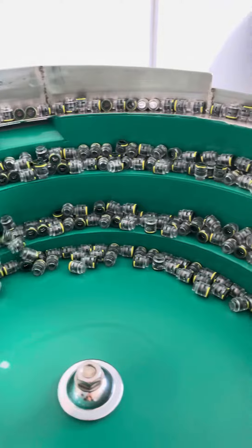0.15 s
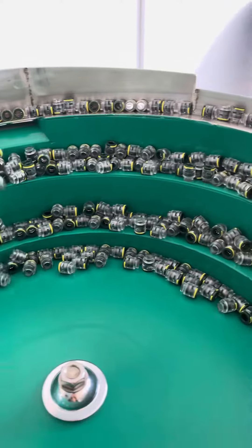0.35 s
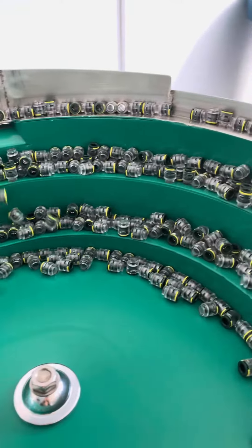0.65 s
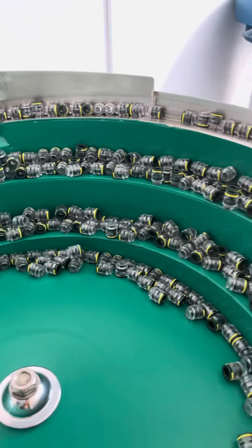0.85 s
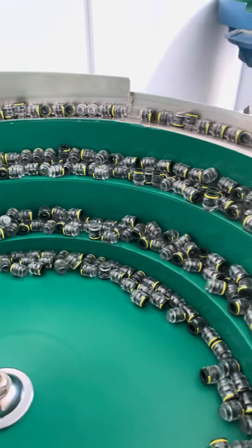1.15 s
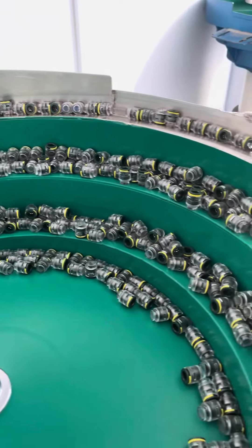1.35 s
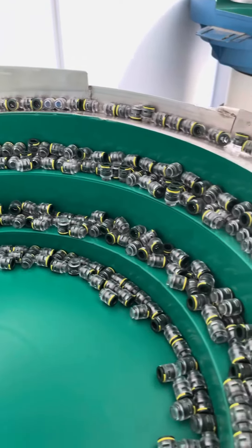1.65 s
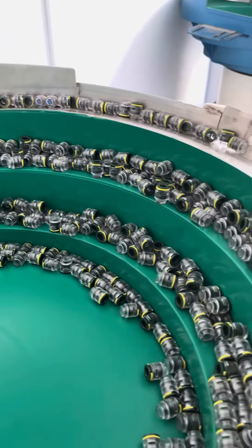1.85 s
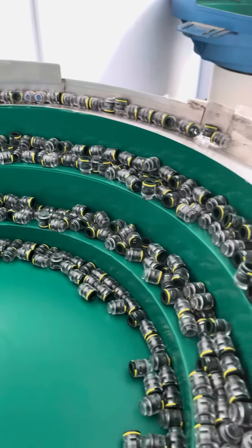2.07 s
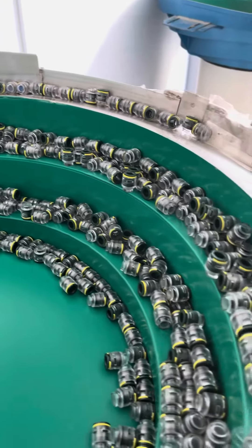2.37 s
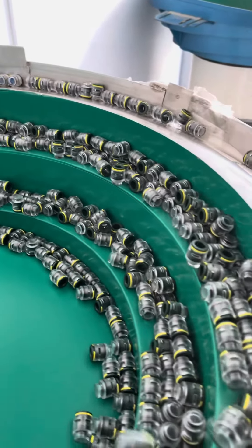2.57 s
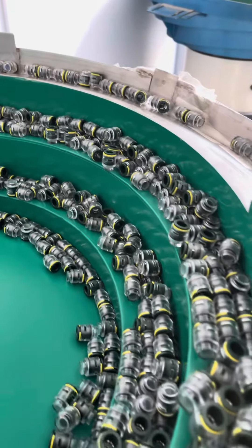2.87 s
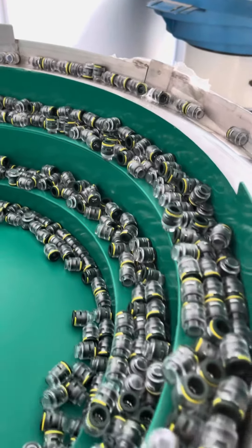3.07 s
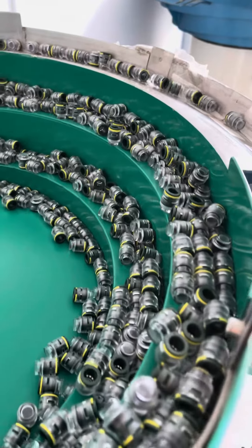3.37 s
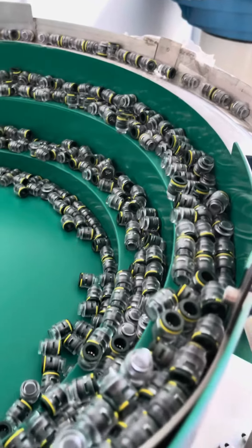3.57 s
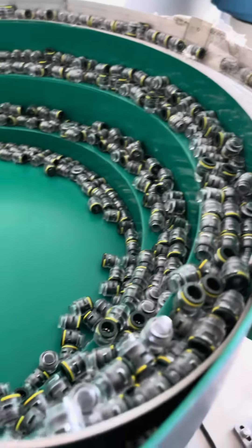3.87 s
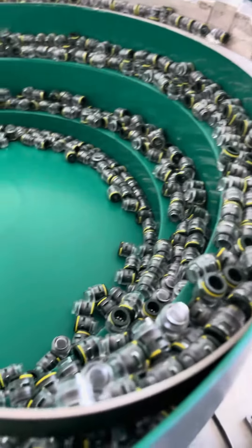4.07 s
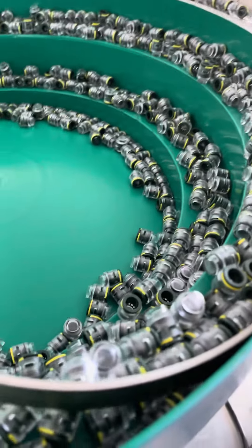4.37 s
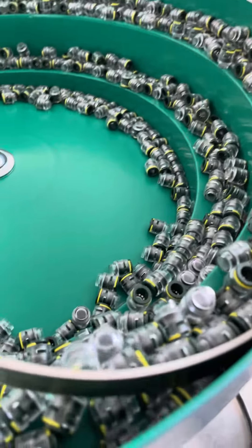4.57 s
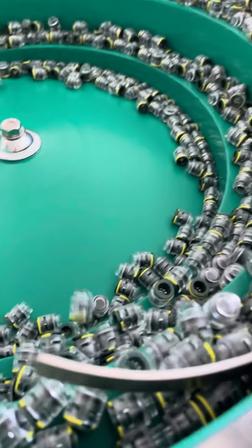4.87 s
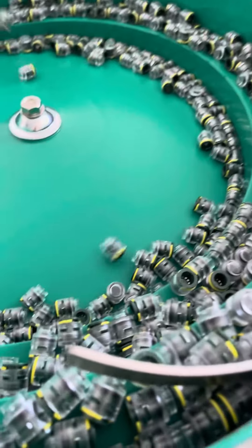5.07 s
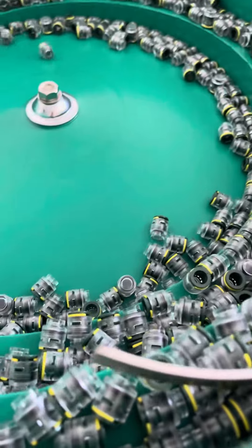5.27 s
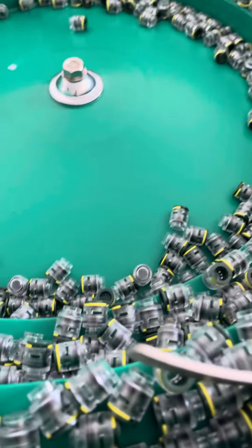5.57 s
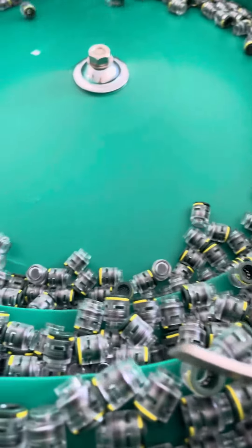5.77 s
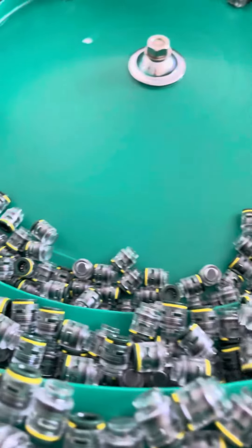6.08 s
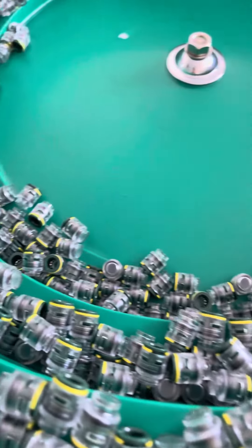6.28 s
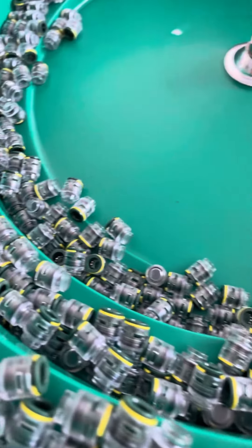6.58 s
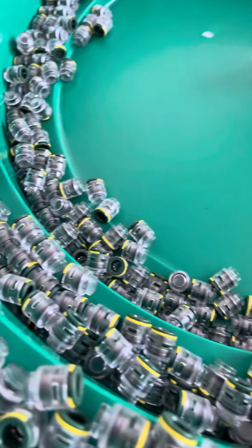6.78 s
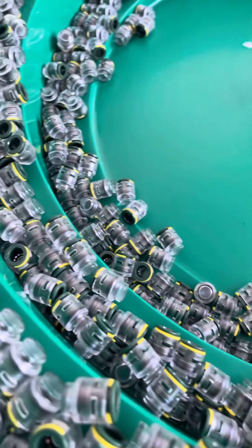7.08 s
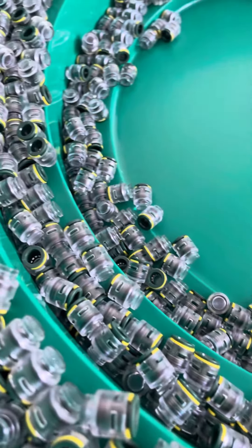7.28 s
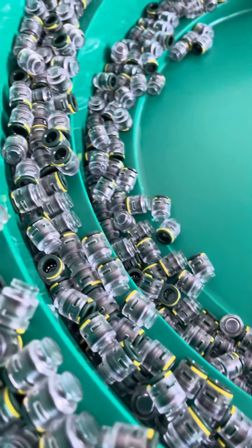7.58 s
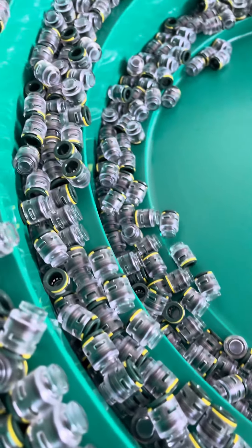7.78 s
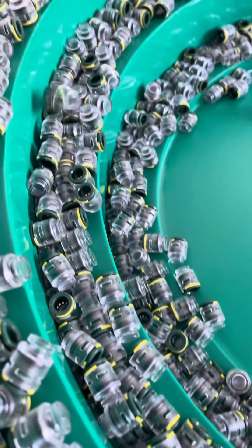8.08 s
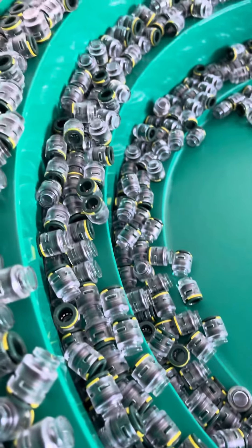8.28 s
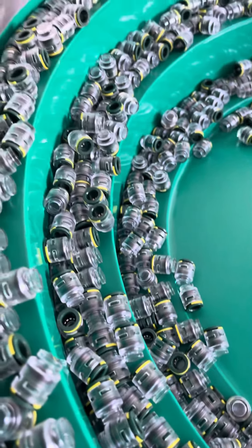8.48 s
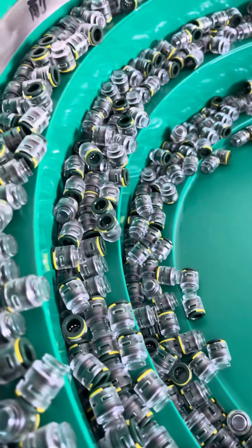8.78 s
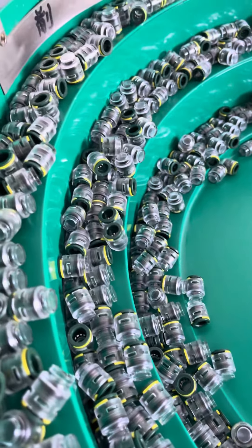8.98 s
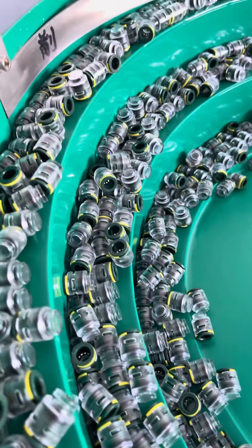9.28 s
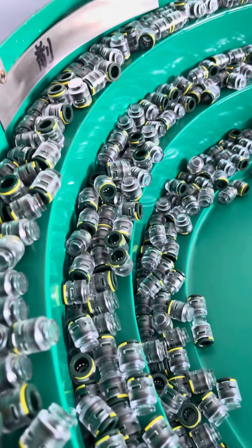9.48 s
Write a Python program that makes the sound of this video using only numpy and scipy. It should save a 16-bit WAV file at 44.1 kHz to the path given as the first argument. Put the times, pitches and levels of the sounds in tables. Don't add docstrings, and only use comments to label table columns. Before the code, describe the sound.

A vibratory feeder bowl drones with a low, steady mains hum while countless small plastic fittings chatter along its spiral track. Irregular bright clacks, short clatters and small ticks come several times a second, some ringing a steel rail, others thudding dully on the coated floor. Close stereo phone sound in a workshop, loud, bright and slightly squashed on the sharpest hits, without any pause from start to end.

```python
import sys
import numpy as np
from scipy import signal
from scipy.fft import rfft, irfft, next_fast_len
from scipy.io import wavfile
from scipy.ndimage import uniform_filter1d

SR = 44100
rng = np.random.default_rng(int(sys.argv[2]) if len(sys.argv) > 2 else 0)


def convert_level_to_amplitude(level_db):
    exponent = np.asarray(level_db, float) / 20
    return 10 ** exponent


def transcribe(u):
    v = np.clip(np.atleast_2d(u).T, -1, 1)
    q = np.round(v * 32767).astype(np.int16)
    wavfile.write(sys.argv[1], SR, q)


N = 425124

SHAKE_HZ = 50.016
SECOND_DB, SECOND_FOLLOWS = -23, 0.38
LEAD_RAD_PER_DB = .035
RIM_FROM_S, RIM_DB_PER_S = 8.3, -11
BODY_DB, BODY_FOLLOWS, FIZZ_DB, JOSTLE_DB = -26.5, 0.36, -29.5, -30.0
EDGE_DB_PER_DB = -0.38
ROLL_T60_S, SLAP_T60_S, TICK_T60_S, BOUNCE_T60_S = 0.16, 0.076, 0.16, 0.09
CRACK, CRACK_S = 0.8, 0.004
FLOOR_SPREAD_DB = 3.5
TAP_HZ, NICK_T60_S, NICK_WIDTH_HZ = 6200, .07, 700
DUCK_FROM_DB, DUCK_SHARE, DUCK_S = -16.5, 0.5, 0.0066

# time in seconds, hum level in dB, left over right in dB.
HUM_PATH = [
    (0.0, -13.5, -3.5),
    (0.35, -14, -4),
    (2.2, -14.5, -3.5),
    (3.76, -19, 0),
    (6.68, -16.5, -1.5),
    (9.64, -17, -4),
]
# time in seconds, way in wave lengths.
BOWL_WAY = [(0.0, 0.013), (1.0, 0.44), (2.25, 0.46), (4.4, 0.59), (7.3, 0.99), (9.64, 1)]
# multiple of the shake, level in dB.
HUM_ORDERS = [(3, -34), (4, -38), (5, -45), (6, -44), (8, -48), (10, -48), (11, -47)]
ORDER_LAG_RAD = [.27, 1.6, 1.5, 2.4, 3., 4.2, 5.4, 6.]
# order, mean level in dB, swing in dB, crests per wave length, first crest in wave lengths.
WALL_WAVES = [(12, -39, 1.5, 1.9, .55), (14, -40.5, 7.5, .62, 1.12), (15, -40.5, 4, .9, .62),
              (16, -39.5, 3.5, .9, .86)]
# start in seconds, clack level in dB, shell pitch in Hz, rail ring in dB, clack t60 in seconds.
STRIKES = [(0.4663, -11.5, 7740, -10, 0.1), (1.0824, -6, 6200, -5.5, 0.2), (1.4108, -5, 6100, -5, 0.073),
           (1.478, -4, 6000, -12.5, 0.068), (1.566, -17.5, 3700, -2.5, 0.087),
           (1.695, -17, 6960, -2.5, 0.41), (2.7544, -5, 6500, -6.5, 0.25), (2.873, -15.5, 6400, -3.5, 0.52),
           (3.6501, -3.5, 6600, -7, 0.19), (3.973, -4.5, 6030, -3.5, 0.24), (4.228, -6.5, 6400, -5, 0.068),
           (5.6001, -5.5, 5460, -3.5, 0.24), (5.7625, -11, 5370, -5, 0.11), (6.0019, -9.5, 6200, 0.5, 0.36),
           (6.0385, -7, 6440, -9, 0.066), (6.423, -10.5, 4300, -0.5, 0.21), (6.829, -11.5, 4400, -1, 0.23),
           (8.0291, -11, 6400, -2.5, 0.23), (8.1359, -9, 6100, -6.5, 0.29), (8.376, -7.5, 6600, -5, 0.13),
           (8.3987, -9.5, 6200, -6.5, 0.16), (8.85, -11, 6200, -9.5, 0.17), (9.431, -16.5, 7200, -4, 0.1),
           (9.461, -10.5, 4300, -1.5, 0.21)]
# start in seconds, level in dB, shell pitch in Hz, t60 in seconds.
SNAPS = [(0.1303, -4.5, 5030, 0.1), (0.648, -9, 6150, 0.38), (1.269, -18, 3890, 0.17),
         (1.361, -13, 6100, 0.17), (1.4376, -5, 5800, 0.25), (2.0353, -17, 6100, 0.099),
         (2.477, -17, 7340, 0.3), (2.663, -9, 7140, 0.093), (3.032, -6.5, 6200, 0.32),
         (3.332, -13, 7050, 0.06), (3.866, -13.5, 9400, 0.061), (3.9395, -10.5, 6800, 0.12),
         (4.157, -8, 5300, 0.11), (4.2694, -6.5, 3580, 0.15), (4.3977, -9.5, 8230, 0.071),
         (4.452, -6.5, 6100, 0.025), (4.4986, -9, 5850, 0.043), (5.0763, -9, 6600, 0.061),
         (5.169, -14, 6140, 0.075), (5.829, -9.5, 7100, 0.15), (5.896, -4.5, 3560, 0.16),
         (6.224, -8.5, 5900, 0.21), (6.2918, -10.5, 9500, 0.3), (7.192, -13.5, 6040, 0.2),
         (7.468, -15, 6300, 0.03), (7.4939, -13.5, 6300, 0.05), (7.5595, -5, 6000, 0.078),
         (7.9624, -18, 3580, 0.13), (9.25, -17.5, 7140, 0.072)]
# start in seconds, level in dB, shell pitch in Hz.
ROLLS = [(0.0365, -11, 6200), (0.365, -9, 6700), (0.318, -15.5, 6200), (0.5857, -10, 5700),
         (1.639, -11.5, 5550), (1.833, -14.5, 5580), (2.069, -7, 6150), (2.5551, -9, 5960),
         (3.089, -9.5, 5800), (3.158, -11, 3760), (3.7364, -6.5, 6000), (4.007, -7.5, 6460),
         (4.3562, -7.5, 7850), (4.527, -12.5, 3870), (4.922, -11, 5630), (4.9318, -10.5, 7000),
         (4.9524, -20, 6000), (7.034, -7.5, 3770), (7.6808, -10, 7700), (8.5107, -6.5, 3950),
         (9.3547, -6.5, 6400)]
# start in seconds, level in dB, shell pitch in Hz.
SLAPS = [(0.2627, -10, 5940), (0.2768, -7.5, 5500), (0.438, -15.5, 5700), (0.497, -8.5, 5700),
         (1.6033, -11, 6310), (1.917, -13, 5540), (1.952, -6, 5800), (2.155, -12, 6140), (2.436, -12, 6400),
         (3.403, -13, 5900), (3.504, -7, 5800), (4.089, -10.5, 3870), (4.616, -11.5, 5140),
         (4.733, -14, 5730), (4.8254, -2, 6200), (5.0337, -7.5, 6160), (5.1344, -13.5, 7000),
         (5.1903, -9, 6400), (5.4067, -13.5, 6750), (5.444, -12, 6300), (5.578, -4.5, 6330),
         (6.9143, -5, 5930), (7.0074, -8.5, 7000), (7.132, -2.5, 6300), (7.546, -22, 6300),
         (8.1046, -10, 5900), (8.367, -8, 7360), (8.752, -10.5, 6200), (9.4446, -12, 7000),
         (4.9318, -6, 6350)]
# start in seconds, level in dB, shell pitch in Hz.
TICKS = [(0.221, -14.5, 6200), (1.202, -13, 5800), (1.811, -17, 5100), (2.902, -16, 5260),
         (3.8042, -17, 7800), (4.1945, -17, 4000), (5.5417, -21, 7160), (5.6652, -23, 6930),
         (5.9494, -15, 6230), (5.964, -13, 6940), (6.33, -28, 5530), (6.5293, -17.5, 6600),
         (7.226, -11.5, 3660), (7.856, -18.5, 6000), (8.084, -17, 5300), (8.1958, -18, 5220),
         (8.2543, -14, 3570), (8.628, -17, 6600), (8.913, -19, 6280), (9.139, -20, 3770)]
# start in seconds, level in dB, shell pitch in Hz.
BOUNCES = [(0.3806, -14, 6680), (0.531, -11.5, 4660), (.5744, -16, 5700), (1.5329, -15, 7810),
           (1.7468, -18, 5230), (1.784, -12, 2420), (1.89, -16.5, 5800), (2.0894, -15, 6100),
           (3.563, -14.5, 6450), (4.5525, -18, 6800), (4.7444, -17, 2350), (5.0055, -14, 6070),
           (5.459, -17, 2390), (5.5674, -15, 6390), (5.771, -9, 3950), (6.6049, -18, 6910),
           (6.7141, -18, 6800), (7.2983, -14.5, 6400), (8.1005, -22, 6070), (8.1726, -12, 5200),
           (8.9945, -16, 5700), (9.232, -25, 6000), (9.3447, -38, 6370), (9.4994, -13, 2450)]
EDGE_DB = {"strike": -15, "snap": -12.5, "roll": -23, "slap": -21.5, "tick": -16}
GLANCE_DB = {"snap": -19, "roll": -14, "slap": -13.5, "tick": -27}
# frequency in Hz, density in dB per Hz.
CLACK_COLOUR = [(900, -27.5), (2200, -1.5), (4000, -1), (6300, 0.5), (9200, 1), (10800, -6.5), (12500, -18),
                (16000, -38), (16500, -70)]
# frequency in Hz, level in dB, t60 in seconds.
RAIL_MODES = [(1336, -5, .26), (1505, -4, .15), (1658, 0, .28), (2562, -8, .12), (3660, -9, .2),
              (3897, -5, .17), (4360, -4, .2), (4520, -9, .1), (5150, -14, .12), (6160, -8, .12),
              (6700, -7, .2), (7170, -12, .12), (7670, -6, .16), (8120, -9, .1)]
# frequency in Hz, level in dB, t60 in seconds.
RAIL_TOP_MODES = [(4866, -5, .2), (7900, -4, .08), (8634, 0, .13), (8871, 0, .13), (9259, -1, .13),
                  (9797, -4, .12), (10335, -6, .07), (10700, -5, .07)]
# frequency in Hz, level in dB, t60 in seconds.
PLATE_MODES = [(1490, 0, 0.17), (1900, -6, .12), (2519, 4, 0.16), (3251, 9, .2), (3820, -1, 0.17),
               (4005, -2, 0.2), (4801, -1, .15), (5211, 1, .2), (5684, -12, .1), (6416, 7, 0.13),
               (7708, 6, 0.11), (7816, 6, .1)]
# start in seconds, level in dB.
PLATE_PINGS = [(0.466, -25), (1.5329, -28), (2.754, -45), (2.901, -28), (3.7382, -26), (3.8046, -43),
               (4.157, -45), (4.3569, -26.5), (5.762, -26), (6.529, -30), (8.174, -31), (8.511, -26)]
# start in seconds, level in dB, low mode in Hz, high mode share in dB.
THUDS = [(0.132, -19.5, 1190, 10), (.465, -31, 1070, 21.5), (0.591, -12, 686, 7), (1.411, -26, 750, 11),
         (1.446, -5.5, 686, 1), (1.953, -11, 665, -9), (2.07, -5, 680, -3), (2.754, -15, 1170, -14),
         (3.162, -7.5, 1120, -7), (3.275, -15.5, 660, 6), (3.504, -12.5, 695, 7.5), (3.982, -12, 1143, -2),
         (4.195, -21.5, 655, 13), (4.228, -31, 755, 9), (4.826, -15, 690, 8), (4.931, -9.5, 684, 7),
         (5.032, -6.5, 1140, -6), (5.268, -22, 700, 10), (5.581, -14.5, 666, 13), (5.833, -22, 770, 15),
         (6.422, -23, 816, -7), (7.041, -6, 686, 5), (7.137, -8.5, 678, 1.5), (7.195, -3, 1057, -9),
         (7.232, -7.5, 693, 2), (7.544, -6.5, 697, -3), (2.96, -15, 1120, 5), (4.96, -10, 670, -6),
         (1.49, -19, 1080, 10), (9.5, -16.5, 680, 6), (8.028, -23, 700, 8), (8.397, -15, 1033, 11.5),
         (8.96, -8, 686, -7), (5.06, -12, 654, -16), (8.753, -10.5, 694, 2.5), (8.858, -9, 710, 3.5),
         (9.475, -14.5, 710, 13)]
# frequency in Hz, level in dB, width in Hz.
FLOOR_MODES = [(1033, -15, 30), (1188, -6, 30), (1242, -4, 30), (1507, 3.5, 61), (1733, 2, 38),
               (2000, -7.5, 45), (2344, 0, 32), (2750, -3, 110), (3180, -6, 83)]
# start in seconds, level in dB, pitch in Hz.
NICKS = [(0.2113, -16.5, 8600), (0.3723, -19, 8850), (0.5836, -20, 10100), (1.1907, -22, 9000),
         (1.2224, -16, 8250), (1.4223, -14, 9000), (1.467, -15, 8400), (1.7472, -13, 9360),
         (1.7656, -19, 9550), (1.7871, -13, 9300), (2.4969, -17, 9900), (2.7834, -21, 8550),
         (2.9669, -19, 9600), (3.0908, -22, 8700), (3.1212, -20, 9660), (3.2734, -16.5, 9500),
         (3.9415, -7, 9150), (4.1844, -23, 7800), (4.5269, -15, 9700), (4.7369, -23, 10400),
         (5.1893, -14, 9100), (5.269, -18, 9050), (5.4071, -21, 9500), (5.4524, -12.5, 9500),
         (5.5754, -15, 8600), (5.8866, -18, 10600), (5.9632, -19, 8200), (5.9858, -18, 9900),
         (6.0385, -22, 9400), (6.3305, -11, 9050), (6.4437, -20, 9300), (6.4675, -17, 9100),
         (6.6439, -17, 8400), (6.7136, -14, 9200), (6.9984, -17, 8400), (7.2969, -22, 10300),
         (7.544, -15, 8200), (7.6165, -17, 9600), (8.1037, -19, 9800), (8.1954, -15, 9700),
         (8.2939, -17, 9400), (9.3856, -20, 9170), (9.4306, -18.5, 9100), (9.4734, -6, 8680),
         (9.4912, -15.5, 9250)]
# start in seconds, level in dB.
TAPS = [(.0533, -23), (0.34, -21), (.4255, -21), (1.2944, -28), (1.3378, -24), (2.3678, -39), (2.6401, -26),
        (2.8321, -23), (2.9275, -23), (3.321, -21), (3.365, -26), (4.669, -23), (7.7151, -20),
        (7.8348, -21), (8.4575, -22), (8.9471, -29), (9.6081, -28)]
# time in seconds, level in dB.
CROWD_LIVELY = [(0.0, 2.5), (0.54, 4), (0.7, -1.5), (1.5, 1), (2.3, -2), (3.3, -1), (4.6, -0.5), (5.3, 0),
                (6.2, -1), (6.7, 1), (7.4, 0), (7.9, -0.5), (8.56, 1.5), (9.15, -5.5), (9.64, 0)]
# frequency in Hz, density in dB per Hz.
CROWD_BODY = [(45, 5), (90, 5.5), (170, 4.5), (320, -5.5), (361, -0.5), (400, -6.5), (570, -10.5),
              (620, -1), (675, 4.5), (770, -4.5), (930, -3.5), (1600, 0), (2650, -0.5), (3000, -6.5),
              (5000, -37.5)]
# frequency in Hz, density in dB per Hz.
CROWD_FIZZ = [(1500, -16.5), (3000, 3), (4800, -3), (6300, -2.5), (9200, -0.5), (10500, -4), (12800, -14),
              (13500, -28.5), (16300, -60)]
# frequency in Hz, likeness from 0 to 1, right over left in dB.
PORT_LIKENESS = [(60, 0.69, -4.5), (232, 1, 4.5), (440, 0.65, 8.5), (830, 0.025, 7), (2010, 0.96, -1.5),
                 (2450, 0.048, 3), (2930, 0.28, 0), (4400, 0.39, 2), (5030, 0.7, -0.5), (5030, 0.57, 4.5),
                 (5200, 0.64, 4), (5800, 1, -1.5), (7050, 0.66, 1), (9800, 0.95, -1), (10290, 0.7, 1),
                 (11900, 0.7, -1)]
# frequency in Hz, phase of right against left in radians.
PORT_TURN = [(0, .15), (500, 1.), (1000, -.6), (1800, -.1), (2300, -.8), (2700, -3), (3300, -2.8),
             (4000, -1.1), (4850, -3.1), (5800, -6.28), (8300, -9.1), (9400, -9.43), (11900, -12.57),
             (13800, -12.6)]


def evened(x):
    return x / np.sqrt(np.mean(x ** 2) + 1e-20)


def curves(rows):
    s, *columns = np.transpose(rows)
    return [np.interp(np.arange(N) / SR, s, c) for c in columns]


def read(points, hz, order=1):
    table = np.transpose(points)
    return np.interp(np.log(hz + 1), np.log(table[0] + 1), table[order])


def coloured(x, points):
    size = next_fast_len(N)
    gain = convert_level_to_amplitude(read(points, np.fft.rfftfreq(size, 1 / SR)))
    return evened(irfft(rfft(x, size) * gain, size)[:, :N])


def drift(seconds, count):
    z = rng.standard_normal((count, N // 100 + 2))
    width = max(int(seconds * SR / 100), 1)
    z = evened(uniform_filter1d(uniform_filter1d(z, width), width))
    return np.array([np.interp(np.arange(N) / 100, np.arange(len(v)), v) for v in z])


def ringing(z, hz, width_hz):
    r = np.exp(-np.pi * width_hz / SR)
    return evened(signal.lfilter([1, 0, -1], [1, -2 * r * np.cos(2 * np.pi * hz / SR), r * r], z))


def mode_bank(table, t):
    hz, db, t60_s = np.transpose(table)[:, :, None]
    return convert_level_to_amplitude(db - 60 * t / t60_s) * np.exp(2j * np.pi * hz * t)


def struck(modes, spread_db):
    g = rng.standard_normal((2, 2, len(modes)))
    return ((convert_level_to_amplitude(spread_db * g[0]) * np.exp(9j * g[1])) @ modes).real


def place(out, start_s, sound):
    at = round(start_s * SR)
    out[:, at:at + sound.shape[1]] += sound


def rise(t, seconds):
    return 1 - np.exp(-t / seconds)


def shake():
    return 2 * np.pi * SHAKE_HZ * np.arange(N) / SR + 1.012


def hum():
    first_db, pan_db = curves(HUM_PATH)
    way, = curves(BOWL_WAY)
    angle, out = shake(), np.zeros((2, N))
    second_db = SECOND_DB + SECOND_FOLLOWS * (first_db - first_db.mean())
    levels = [(1, first_db), (2, second_db)] + HUM_ORDERS
    lags = [LEAD_RAD_PER_DB * (first_db - first_db.max())] + ORDER_LAG_RAD
    port_lead = np.array([[0], [.18]])
    for (k, db), wobble, lag in zip(levels, drift(0.051, count=len(levels)), lags):
        out = out + convert_level_to_amplitude(db + 0.2 * k * wobble) * np.cos(k * angle - lag + port_lead / k)

    wall_lean_db = np.array([[-3.1], [2.1]])
    past_rim_s = np.maximum(np.arange(N) / SR - RIM_FROM_S, 0)
    phases = drift(1.5, count=8).reshape(4, 2, -1)
    for (k, mean_db, swing_db, crests, first), wobble, phase in zip(WALL_WAVES, drift(.08, count=4), phases):
        k = round(k)
        db = mean_db + swing_db * np.cos(2 * np.pi * crests * (way - first))
        if k == 16:
            db = db + RIM_DB_PER_S * past_rim_s
        out = out + convert_level_to_amplitude(db + 1.75 * wobble + wall_lean_db) * np.cos(k * angle + 0.6 * phase)
    return np.sqrt(2) * out * convert_level_to_amplitude(np.array([pan_db, -pan_db]) / 2)


def landings():
    rows = [(s, db, hz, rail, "strike", t60) for s, db, hz, rail, t60 in STRIKES]
    rows += [(s, db, hz, GLANCE_DB["snap"], "snap", t60) for s, db, hz, t60 in SNAPS]
    kinds = [("roll", ROLLS, ROLL_T60_S), ("slap", SLAPS, SLAP_T60_S), ("tick", TICKS, TICK_T60_S),
             ("slap", BOUNCES, BOUNCE_T60_S)]
    for kind, table, t60 in kinds:
        rows += [(s, db, hz, GLANCE_DB[kind], kind, t60) for s, db, hz in table]
    return [(s, db, hz, rail, EDGE_DB[kind] + EDGE_DB_PER_DB * (db + 8.0), t60)
            for s, db, hz, rail, kind, t60 in rows]


def clack_burst(grit, hz, edge_db):
    shell = 0.25 * ringing(grit, hz, 260)
    chance = 0.17 * sum(ringing(grit, f, 80) for f in rng.uniform(1537, 9000, size=4))
    treble = signal.lfilter(*signal.butter(2, 8600, "high", fs=SR), grit)
    return grit + shell + chance + (convert_level_to_amplitude(0.96 * (edge_db + 20.5)) - 1) * treble


def falls():
    rail, clack, t = np.zeros((2, N + SR)), np.zeros((2, N + SR)), np.arange(SR // 5) / SR
    modes = mode_bank(RAIL_MODES, t) * rise(t, 0.0041) ** 2
    spread_db = np.where(np.transpose(RAIL_MODES)[0] < 1700, 1.5, 3)
    for s, db, hz, rail_db, edge_db, t60 in landings():
        t60 = max(t60, .02)
        heard = t[:round(t60 * SR)]
        rise_s = .0001 if edge_db > -18 else .0009
        die = convert_level_to_amplitude(-60 * heard / t60) * rise(heard, rise_s) * (1 + CRACK * np.exp(-(heard / CRACK_S) ** 2))
        burst = clack_burst(rng.standard_normal((2, len(heard))), hz, edge_db)
        place(clack, s, convert_level_to_amplitude(db - 1.42) * burst * die)
        lean_db = 1.7 * (rail_db + 10)
        if lean_db >= -10:
            rattle = 1 + 0.4 * evened(uniform_filter1d(rng.standard_normal(len(t)), 150))
            place(rail, s, convert_level_to_amplitude(db + lean_db - 18.5) * struck(modes, spread_db) * rattle)
    hz = np.fft.rfftfreq(512, 1 / SR)
    colour = signal.minimum_phase(signal.firwin2(511, hz, convert_level_to_amplitude(2 * read(CLACK_COLOUR, hz)), fs=SR))
    return convert_level_to_amplitude(-1.97) * signal.oaconvolve(clack, colour[None], axes=1)[:, :N] + rail[:, :N]


def rail_top():
    out, t = np.zeros((2, N + SR)), np.arange(SR // 6) / SR
    modes = mode_bank(RAIL_TOP_MODES, t) * rise(t, 0.0016)
    for s, db, _, rail_db, _ in STRIKES:
        rattle = 1 + .6 * evened(uniform_filter1d(rng.standard_normal(len(t)), size=90))
        place(out, s, convert_level_to_amplitude(db + 1.9 * rail_db - 4.0) * rattle * struck(modes, 5.1))
    return out[:, :N]


def thuds():
    out, t = np.zeros((2, N + SR)), np.arange(SR // 7) / SR
    die = convert_level_to_amplitude(-60 * t / .105) * rise(t, .002)
    for s, db, low_hz, high_db in THUDS:
        spot_db = FLOOR_SPREAD_DB * rng.standard_normal(len(FLOOR_MODES))
        shove = rng.standard_normal((2, len(t))) * die
        low = ringing(shove, low_hz, 28) + .8 * ringing(shove, low_hz * .98, 45)
        upper = sum(convert_level_to_amplitude(d + e) * ringing(shove, f, w) for (f, d, w), e in zip(FLOOR_MODES, spot_db))
        high = 0.5 * upper + 0.35 * ringing(shove, 2170, 1600)
        place(out, s, convert_level_to_amplitude(db - 23.5) * (convert_level_to_amplitude(-7.5) * low + convert_level_to_amplitude(high_db - 3.5) * high))
    return out[:, :N]


def plate():
    out, t = np.zeros((2, N + SR)), np.arange(SR // 5) / SR
    modes = mode_bank(PLATE_MODES, t) * rise(t, 0.0026)
    for s, db in PLATE_PINGS:
        place(out, s, convert_level_to_amplitude(db) * struck(modes, 1.5))
    return out[:, :N]


def nicks():
    out, t = np.zeros((2, N + SR)), np.arange(SR // 16) / SR
    die = convert_level_to_amplitude(-60 * t / NICK_T60_S) * rise(t, 0.00031)
    for s, db, hz in NICKS + [(s, db, TAP_HZ) for s, db in TAPS]:
        puff = ringing(rng.standard_normal((2, len(t))), hz, NICK_WIDTH_HZ)
        place(out, s, convert_level_to_amplitude(db - 2.5) * die * puff)
    return out[:, :N]


def jostle():
    hit = rng.random((2, N)) < 900 / SR
    size = convert_level_to_amplitude(4.5 * np.minimum(rng.exponential(1, (2, N)), 3)) * hit
    shell = rng.integers(0, 18, (2, N))
    pitches_hz = np.geomspace(1300, 6500, 18) * rng.uniform(.96, 1.04, 18)
    return evened(sum(ringing(size * (shell == k), hz, .013 * hz) for k, hz in enumerate(pitches_hz)))


def crowd():
    lively_db, = curves(CROWD_LIVELY)
    flutter = drift(.012, count=2)
    beat = convert_level_to_amplitude(0.21 * np.cos(shake() - 4.2))
    low = coloured(rng.standard_normal((2, N)) * beat * convert_level_to_amplitude(1.75 * flutter[0]), CROWD_BODY)
    knocks = convert_level_to_amplitude(6.5 * np.minimum(rng.exponential(1, N), 3)) * (rng.random(N) < 300 / SR)
    knocks = signal.lfilter([1], [1, -np.exp(-1 / (.004 * SR))], knocks)
    grain = (0.97 + 0.32 * evened(knocks)) * convert_level_to_amplitude(0.35 * flutter[1])
    high = coloured(rng.standard_normal((2, N)) * grain, CROWD_FIZZ)
    return convert_level_to_amplitude(BODY_DB + BODY_FOLLOWS * lively_db) * low + convert_level_to_amplitude(FIZZ_DB + lively_db) * high


def ports(pair):
    size = next_fast_len(N)
    hz, (left, own) = np.fft.rfftfreq(size, 1 / SR), rfft(pair, size)
    same = np.clip(read(PORT_LIKENESS, hz), 0, 1)
    turn = np.exp(1j * np.interp(hz, *np.transpose(PORT_TURN)))
    right = same * turn * left + np.sqrt(1 - same ** 2) * own
    return irfft([left, right * convert_level_to_amplitude(read(PORT_LIKENESS, hz, order=2))], size)[:, :N]


def scene():
    parts = falls() + rail_top() + thuds() + plate() + nicks()
    return hum() + ports(parts + crowd() + convert_level_to_amplitude(JOSTLE_DB) * jostle())


def squeezed(x):
    treble = signal.lfilter(*signal.butter(2, 7000, "high", fs=SR), x)
    power = uniform_filter1d((treble ** 2).mean(0), max(int(DUCK_S * SR), 1))
    power_db = 10 * np.log10(abs(power) + 1e-12)
    return x / convert_level_to_amplitude(DUCK_SHARE * np.maximum(power_db - DUCK_FROM_DB, 0))


def kept_bands(z, margin_db=8., slope_db=2.0, linger_db=4.0, doubt_db=2.36):
    level_db = 10 * np.log10((abs(z[:, :1024]) ** 2).reshape(2, 32, 32, -1).sum(2) + 1e-14)
    step_db = slope_db * np.arange(32)[7:, None]
    mask_db = np.maximum.accumulate(level_db.max(0)[7:] + step_db, axis=0) - step_db - margin_db
    mask_db = np.maximum(mask_db, np.roll(mask_db, 1, axis=1) - linger_db)
    doubt = uniform_filter1d(rng.standard_normal((2, *mask_db.shape)), size=3) * np.sqrt(3)
    keep = level_db[:, 7:] + doubt_db * doubt > mask_db
    keep[:, 11:] = np.logical_and.accumulate(keep[:, 11:], axis=1)
    keep[:, 12:15] |= (level_db[:, 19:22] > mask_db[12:15] - 9) & (doubt[:, 12:15] > 1.6)
    keep[:, :4] = True
    return keep


def starved(x, hit_db=6.0):
    pair = np.array([x[0] + x[1], x[0] - x[1]]) / 2
    window = np.sin(np.pi * (np.arange(2048) + .5) / 2048)
    frames = dict(window=window, nperseg=2048, noverlap=1024)
    z = signal.stft(np.pad(pair, ((0, 0), (680, 0))), **frames)[2]
    z[:, 224:1024] *= np.repeat(kept_bands(z), 32, axis=1)
    thinned = signal.istft(z, **frames)[1][:, 680:680 + N]
    lost = signal.sosfiltfilt(signal.butter(4, 13800, fs=SR, output="sos"), pair - thinned)
    power = (np.diff(pair, n=3, prepend=np.zeros((2, 3))) ** 2).sum(0)
    jump = uniform_filter1d(power, size=256) / uniform_filter1d(power, size=2048, origin=900)
    jump_db = 10 * np.log10(abs(jump) + 1e-9)
    spared = uniform_filter1d(np.clip((jump_db - hit_db) / 2, 0, 1), size=128)
    mid, side = thinned + lost * spared
    return np.array([mid + side, mid - side])


def top_cut(x):
    return signal.sosfilt(signal.butter(12, 16340, fs=SR, output="sos"), x)


def record(dry):
    limited = np.clip(1.164 * np.tanh(squeezed(dry) / 1.225), -1, 1)
    mix = starved(limited)
    return top_cut(mix)


dry = scene()
out = record(dry)
transcribe(out)
```